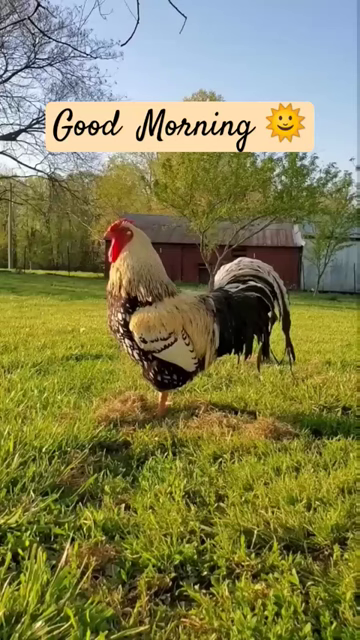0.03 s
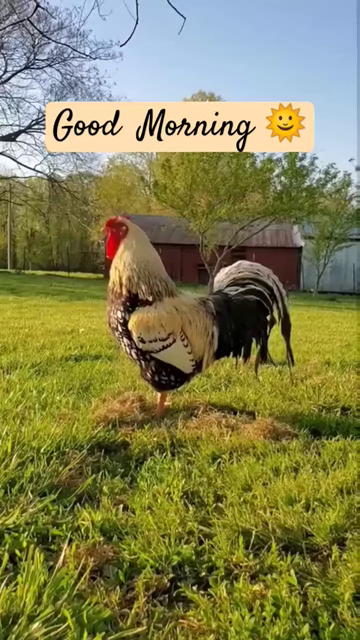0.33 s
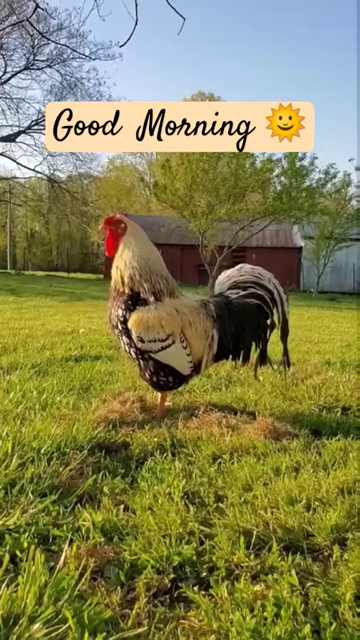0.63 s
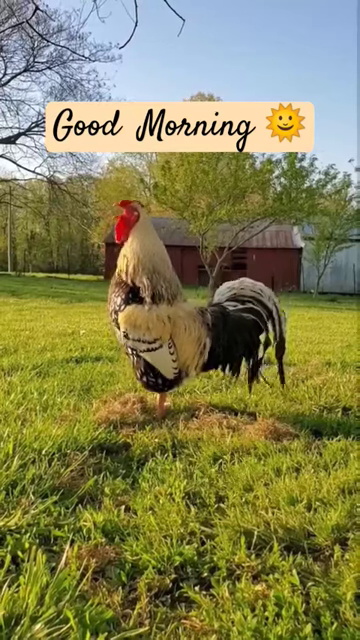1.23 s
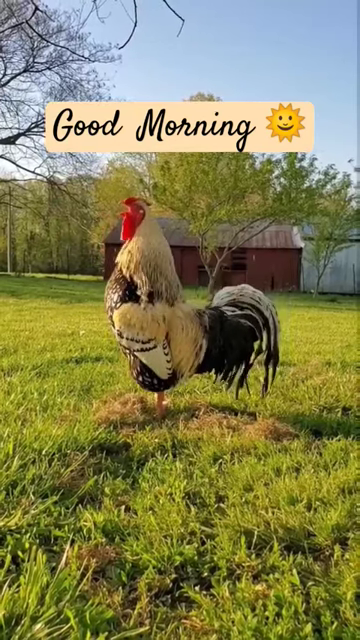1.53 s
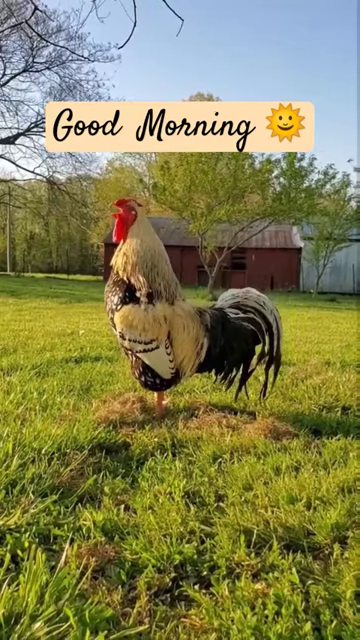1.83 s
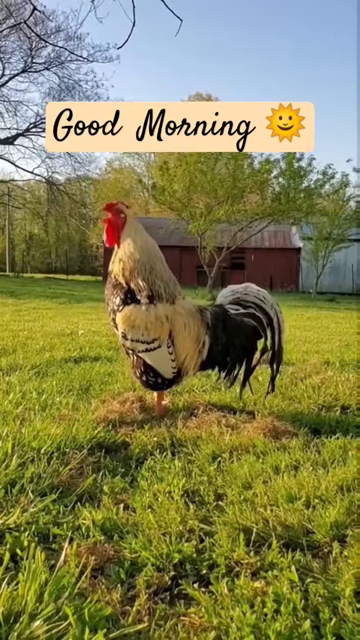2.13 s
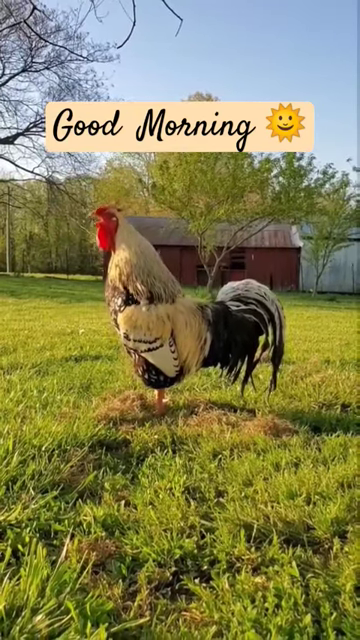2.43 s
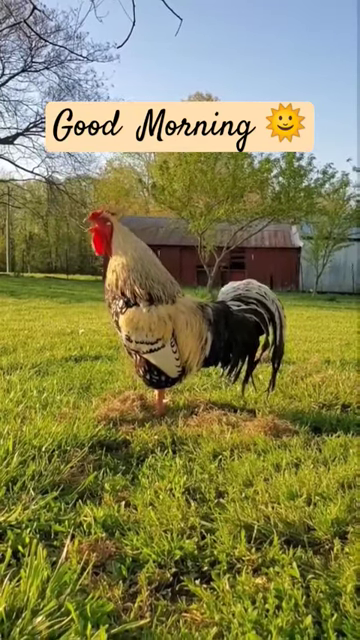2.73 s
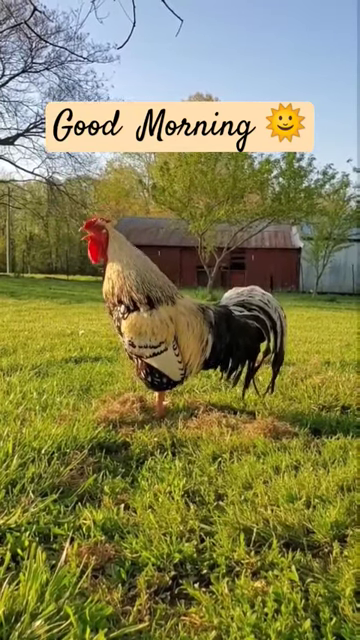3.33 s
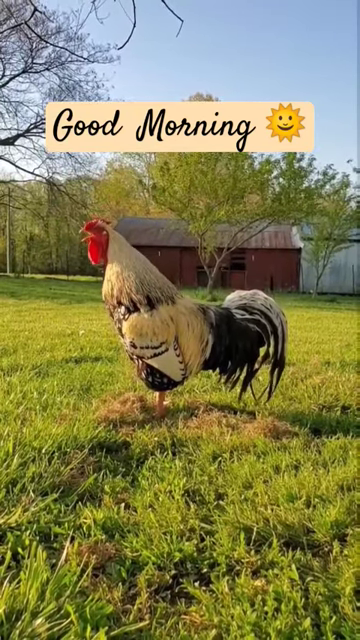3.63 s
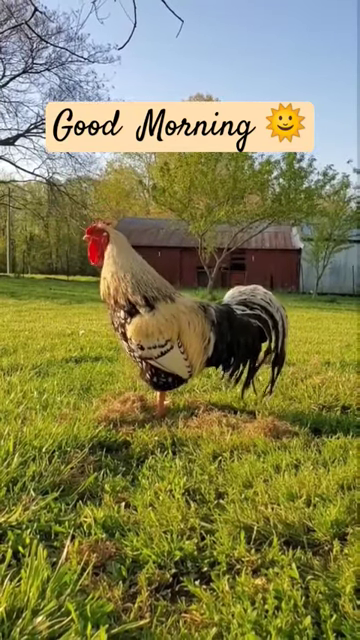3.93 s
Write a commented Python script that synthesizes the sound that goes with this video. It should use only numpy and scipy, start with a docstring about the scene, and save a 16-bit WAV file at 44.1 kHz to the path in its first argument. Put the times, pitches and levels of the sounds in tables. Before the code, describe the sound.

One loud rooster crow, raspy between its held notes, rises over quiet outdoor air.

```python
"""An open lawn: first faint outdoor air and a low throb like a far idling engine, then a few distant birds.
At 1.5 s a rooster close by crows once, in four syllables, while the throb and the air sink lower.
Its voice box makes pulses, coloured by throat, beak and nearby reflections; breath rushes out too.
A rough yelp opens the crow. Two clean held notes follow, each ending in a crack of rasp and
half tones (extra tones between the overtones). In the last syllable the voice sags away."""
import sys
import numpy as np
from scipy import signal
from scipy.fft import rfft, irfft
from scipy.io import wavfile
from scipy.ndimage import uniform_filter1d

SR = 44100
rng = np.random.default_rng(int(sys.argv[2]) if len(sys.argv) > 2 else 0)


def transcribe(u):
    """Save the signal u as a 16-bit wav file named by the first command-line argument.

    u: samples, shape (n,) or (channels, n), limited to [-1, 1]; the rate is SR.
    q: integer samples, one column per channel.
    """
    v = np.clip(np.atleast_2d(u).T, -1, 1)
    q = np.round(v * 32767).astype(np.int16)
    wavfile.write(sys.argv[1], SR, q)


N = 176400
TIME, FREQS = np.arange(N) / SR, np.fft.rfftfreq(N, 1 / SR)
BACKGROUND_START_S, CROW_START_S, HIGHEST_HZ = 0.287, 1.498, 15600


def amp(db):
    """Turn decibels into a factor to multiply by."""
    return 10 ** (np.asarray(db) / 20)


def unit_level(x):
    """Scale a signal to an average power of 1."""
    return x / np.sqrt(np.mean(x ** 2) + 1e-20)


def over_frequency(table, hz=FREQS):
    """Join the rows of a frequency table into a curve, spacing octaves evenly."""
    f, value = np.transpose(table)
    return np.interp(np.log(hz + 1), np.log(f), value)


def over_time(table):
    """Join the rows of a time table into one curve for each column of values."""
    times, *columns = np.transpose(table)
    return [np.interp(TIME, times, column) for column in columns]


def phase(hz):
    """The running angle of a wave whose pitch changes."""
    return 2 * np.pi * np.cumsum(hz) / SR


def gate(start, end, fade_s):
    """1 between two times and 0 outside, with a fade at each end."""
    return np.clip(np.minimum(TIME - start, end - TIME) / fade_s, 0, 1)


def wobble(hz):
    """A smooth random wiggle, about 1 in size, at rates up to hz."""
    size = N // 20
    slow = irfft(rfft(rng.standard_normal(size)) / (1 + (FREQS[:size // 2 + 1] / hz) ** 4), size)
    return np.interp(np.arange(N), np.arange(size) * 20, unit_level(slow))


# The tones of the throb: multiple of the cycle rate, level/dB
ENGINE_TONES = [(5, -44.5), (8, -37), (9, -46), (10, -49.5), (11, -49.5)]
# How the background sinks during the crow: t/s, level change/dB
BACKGROUND_DIP = [(1.5, 0.5), (1.75, -4), (1.9, -13), (2.8, -18.5), (3.3, -10), (3.9, -17.5)]

def engine():
    """Low tones on one wandering cycle beat together into a throb; the lowest dips less than the rest."""
    cycle_hz = 11.87
    turn = phase(cycle_hz * (1 + 0.015 * wobble(5.2)))
    dip_db, out = over_time(BACKGROUND_DIP)[0], 0
    for k, (multiple, db) in enumerate(ENGINE_TONES):
        level = amp(db + dip_db * (1 if k else 0.63)) * (1 + 0.031 * wobble(33))
        out = out + np.sqrt(2) * level * np.sin(round(multiple) * turn + 2 * np.pi * rng.random())
    return out


# The tone colour of the air: f/Hz, relative level/dB
AIR_COLOUR = [(20, -49), (43, -20), (98, -15.5), (167, -23.5), (231, -20.5), (286, -32), (335, -25),
              (404, -40.5), (573, -40.5), (903, -33.5), (1500, -45), (1950, -57), (2560, -54), (5500, -67),
              (15000, -74)]
# How alike the air sounds in both ears: f/Hz, likeness (1 = the same)
AIR_LIKENESS = [(180, 0.98), (550, 0.93), (1650, 0.2), (4970, 0.37), (15000, 0.14)]

def air():
    """Soft outdoor noise that swells and fades in small drifting patches."""
    level_db, patch_db, dip_share = -56, 2.5, 0.45
    frames, hz = N // 256 + 5, np.fft.rfftfreq(1024, 1 / SR)
    a, b, c, d, patches = rng.standard_normal((frames, len(hz), 5)).T
    patches = uniform_filter1d(patches, size=10, axis=0)  # smooth across frequency
    patches = unit_level(uniform_filter1d(patches, size=16, axis=1))  # and across time
    likeness = over_frequency(AIR_LIKENESS, hz)[:, None]
    left = a + 1j * b
    right = likeness * left + np.sqrt(1 - likeness ** 2) * (c + 1j * d)
    ears = np.array([left, right]) * amp(patch_db * patches)
    noise = signal.istft(ears, nperseg=1024, noverlap=768)[1][:, :N]
    spectrum = rfft(noise) * amp(over_frequency(AIR_COLOUR))
    midrange = irfft(spectrum * ((FREQS > 300) & (FREQS < 2000)), N).std()
    return irfft(spectrum, N) / midrange * amp(level_db + dip_share * over_time(BACKGROUND_DIP)[0])


# One bird note a row: start t/s, length/s, pitch f/Hz, blur/Hz, level/dB
BIRD_NOTES = [(0.428, 0.04, 2990, 500, -72), (0.56, 0.08, 3470, 300, -75), (0.89, 0.037, 3370, 350, -68),
              (0.937, 0.21, 2580, 60, -63.5), (1.16, 0.11, 3450, 298, -71), (0.61, 0.11, 7250, 900, -76)]

def birds():
    """Short notes and chips, blurred by distance."""
    out = np.zeros((2, N))
    for start, length, hz, blur_hz, db in BIRD_NOTES:
        progress = np.clip((TIME - start) / length, 0, 1)
        note = amp(db) * np.sqrt(8 * progress * (1 - progress)) * np.sin(2 * np.pi * hz * TIME)
        out += note * np.array([wobble(blur_hz), wobble(blur_hz)])
    return out


# Overtones that swell or fade alone in the second held note: multiple of the pitch
SWELLING_OVERTONES = (6, 8, 10, 7, 9)
# The swell of each, in the same order: t/s, level change/dB
OVERTONE_SWELLS = [(2.49, -7.5), (2.54, 9), (2.649, 16), (2.75, -21.5), (3.05, 11.5)]

def pulses(hz, offset=0, flicker_db=None):
    """A buzz of equal overtones. flicker_db adds flicker and swells; offset 0.5 gives the half tones."""
    swells, swell_s = dict(zip(SWELLING_OVERTONES, OVERTONE_SWELLS)), 0.082
    turn, out = phase(hz), 0
    for k in range(1, 28):
        db = 0
        if flicker_db is not None:
            db = flicker_db * min(k / 4, 1) ** 3 * wobble(86)  # the lowest three are steadier
            if k in swells:
                when, swell_db = swells[k]
                db = db + swell_db * np.exp(-((TIME - when) / swell_s) ** 2)
        out = out + amp(db) * np.cos((k - offset) * turn) * (k * hz < HIGHEST_HZ + 1000)
    return out


# The tune of the crow (yelp, two held notes, falling end): t/s, f/Hz
CROW_PITCH = [(1.497, 653.5), (1.505, 621.4), (1.52, 621.6), (1.528, 732), (1.56, 738.3), (1.567, 544.7),
              (1.605, 528), (1.645, 446.4), (1.685, 439), (1.704, 544), (1.712, 662), (1.722, 800),
              (1.73, 852), (1.745, 878), (1.765, 883), (1.825, 866), (1.85, 886), (1.872, 859.6),
              (1.93, 910.6), (2.04, 931.6), (2.2, 909.6), (2.245, 862.6), (2.278, 726.6), (2.3, 691),
              (2.312, 634), (2.324, 633), (2.335, 713), (2.352, 761), (2.372, 880), (2.392, 905.3),
              (2.42, 901), (2.48, 874.7), (2.55, 885), (2.7, 889.5), (2.8, 897.3), (3.04, 887.1),
              (3.125, 875.6), (3.17, 851.7), (3.2, 788), (3.213, 726.5), (3.3, 723.6), (3.318, 802.4),
              (3.355, 837), (3.42, 788.7), (3.53, 755), (3.62, 742.8), (3.73, 700.6), (3.82, 655.2),
              (3.878, 616), (3.886, 543), (4.0, 485.7)]
# Roughness next to the clean voice: t/s, rasp level/dB, half-tone level/dB
HOARSENESS = [(1.5, -13.5, -29), (1.555, -14, -24), (1.575, -4, -14.5), (1.715, -6, -37), (1.745, -35, -40),
              (2.04, -43, -56), (2.235, -35, -48), (2.272, -12, -6.5), (2.31, -10.5, -31), (2.353, -4, 2.5),
              (2.385, -29, -40), (2.45, -50.5, -56.5), (3.13, -42.5, -56.5), (3.19, -20, -32),
              (3.218, 1, 6.5), (3.25, -21.5, -13), (3.28, -7.5, 0.5), (3.325, -12.5, -1.5),
              (3.39, -33.5, -46.5), (3.58, -34, -44.5), (3.66, -29, -21), (3.87, -19, -11),
              (3.885, -5, -29), (3.91, -20.5, -35.5)]
# The tone colour of the hiss in the cracks: f/Hz, relative level/dB
HISS_COLOUR = [(1000, 3), (4500, 13), (9000, 27)]

def voice_box():
    """Where the voice cracks, its pulses shake, mix with hiss and repeat in pairs, making half tones."""
    (hz,), (rasp_db, half_db) = over_time(CROW_PITCH), over_time(HOARSENESS)
    rasp, effort = amp(rasp_db), strain()
    jitter = 0.061 * rasp * wobble(250)
    waver = 0.00094 * wobble(46)
    tremble = 0.0047 * effort * np.sin(phase(90 * (1 + 0.3 * wobble(60))))
    hz = hz * (1 + jitter + waver + tremble)
    buzz = pulses(hz, flicker_db=1.16 + 1.5 * effort)
    half_tones = amp(half_db) * pulses(hz, offset=0.5)
    flutter = 1 + 0.37 * rasp * wobble(360)
    voice = (buzz + half_tones) * flutter + second_voice()
    hiss = irfft(rfft(rng.standard_normal(N)) * amp(over_frequency(HISS_COLOUR)), N)
    return voice + rasp * hiss


def ringing(db):
    """Turn a tone colour into a filter that rings after each pulse, as a hollow space does."""
    cepstrum = irfft(np.log(amp(db)), N)
    forward_only = np.r_[1, np.full(N // 2 - 1, 2), 1, np.zeros(N // 2 - 1)]  # no sound before the pulse
    return np.exp(rfft(cepstrum * forward_only))


# The crow's tone colour in each part: throat and beak resonances, with notches from nearby
# reflections: f/Hz, relative level/dB
YELP_COLOUR = [(300, -41.5), (450, -16), (620, -7.5), (730, -17), (900, -9.5), (1060, 0.5), (1250, -6.5),
               (1460, -0.5), (1750, -27), (2100, -7), (2400, -37.5), (2900, -17.5), (3500, -24.5),
               (4300, -23), (4900, -12.5), (5900, -26.5), (6700, -49), (8000, -37), (11000, -46)]
FIRST_NOTE_COLOUR = [(300, -49.5), (650, -17), (900, -20), (1400, -14), (1760, -15), (1870, -17),
                     (2350, -48), (2620, -33), (2780, -21), (3100, -50.5), (3500, -13), (3720, -26),
                     (4020, -41.5), (4400, -19.5), (4700, -27.5), (5600, -24.5), (6150, -49), (6550, -72.5),
                     (7050, -59.5), (7400, -55.5), (9100, -56.5), (10000, -69.5)]
SECOND_NOTE_COLOUR = [(300, -49.5), (680, -17), (880, -31.5), (1100, -19), (1400, -11), (1780, -20),
                      (2350, -45.5), (2670, -40.5), (3100, -42), (3530, -24.5), (4000, -68.5), (4430, -34),
                      (5350, -28), (6250, -52.5), (7100, -53), (8000, -55), (8900, -53), (9700, -62.5),
                      (10800, -69.5), (11600, -49), (12500, -60)]
CRACK_COLOUR = [(380, -37.5), (730, -36.5), (1100, -26), (1460, -13), (2150, -29), (2400, -50), (3400, -44),
                (4050, -40.5), (4450, -68), (4850, -33), (5250, -51), (6600, -48.5), (7400, -68)]
FALL_COLOUR = [(350, -34), (510, -16.5), (650, -14.5), (715, -44), (760, -27), (820, -29), (920, -28),
               (1020, -31.5), (1300, -15), (1480, -15), (1620, -24.5), (1800, -29), (2140, -29.5),
               (2420, -73.5), (2620, -56.5), (2850, -30.5), (3150, -43), (3450, -49.5), (3800, -42),
               (4250, -55.5), (4480, -73.5), (4900, -45), (5200, -68.5), (5600, -50.5), (6400, -56.5),
               (7400, -80), (8300, -71), (10000, -88)]

def tone_colour(buzz):
    """Five colours in turn: throat and beak resonances, with notches from nearby reflections."""
    colours = [YELP_COLOUR, FIRST_NOTE_COLOUR, SECOND_NOTE_COLOUR, CRACK_COLOUR, FALL_COLOUR]
    changes_s, glide_s = [1.719, 2.332, 3.203, 3.335], 0.057
    reached = [1] + [np.clip((TIME - s) / glide_s + 0.5, 0, 1) for s in changes_s] + [0]
    spectrum, voice = rfft(buzz), 0
    for k, colour in enumerate(colours):
        coloured = irfft(spectrum * unit_level(ringing(over_frequency(colour))), N)
        voice = voice + (reached[k] - reached[k + 1]) * coloured
    return voice


# Loudness of the crow in three bands: t/s, body level/dB, treble level/dB, top level/dB
CROW_LEVELS = [(1.495, -21, -56, -87), (1.503, -12.5, -37.5, -53), (1.512, -10, -32.5, -59),
               (1.523, -17.5, -35, -51), (1.535, -14.5, -33.5, -52), (1.562, -13, -41, -52.5),
               (1.574, -18, -30, -51.5), (1.6, -17, -40, -55), (1.632, -41, -63, -72),
               (1.685, -42.5, -65.5, -92), (1.712, -17, -33.5, -52), (1.76, -13.5, -17, -45),
               (1.825, -15, -19, -46), (1.872, -21, -29.5, -51), (1.915, -16.5, -21.5, -39.5),
               (2.04, -14, -27.5, -42), (2.21, -19.5, -25, -44), (2.262, -27, -37, -54),
               (2.29, -21, -48.5, -65), (2.308, -34, -41.5, -65), (2.34, -22, -43, -64),
               (2.37, -21, -29, -47.5), (2.42, -18, -22, -43.5), (2.85, -21.5, -24.5, -46.5),
               (3.1, -22, -34.5, -41), (3.208, -29, -45.5, -56.5), (3.216, -22, -41, -51),
               (3.3, -20.5, -44.5, -52), (3.325, -24, -39, -50), (3.38, -20.5, -33, -41.5),
               (3.45, -20.5, -33.5, -57), (3.54, -16.5, -39.5, -62.5), (3.63, -15.5, -50, -54),
               (3.725, -15.5, -38.5, -49.5), (3.81, -21, -50, -59.5), (3.89, -20, -55, -65.5),
               (3.98, -23, -59, -74)]

def rooster():
    """The body, treble and top of the voice swell and fade with the bird's effort."""
    spectrum, out = rfft(tone_colour(voice_box())), 0
    band_starts = [(300, 8), (3050, 60), (6400, 60)]  # f/Hz, steepness
    above = [1 / (1 + (edge / (FREQS + 1)) ** steepness) for edge, steepness in band_starts] + [0]
    for k, db in enumerate(over_time(CROW_LEVELS)):
        band = irfft(spectrum * (above[k] - above[k + 1]), N)
        power = uniform_filter1d(uniform_filter1d(band ** 2, size=500), size=400)
        steady = band / np.sqrt(abs(power) + 1e-12)
        shimmer_db = 0.96 * strain() * wobble(43.5)
        out = out + steady * amp(db + shimmer_db)
    return out * np.clip((TIME - CROW_START_S) / 0.0021, 0, 1)


# The tone colour of the breath: f/Hz, relative level/dB
BREATH_COLOUR = [(700, -16.5), (1700, -3), (2400, -21.5), (3000, -8.5), (4000, -7.5), (4450, -21),
                 (4900, 4.5), (5900, 0.5), (7200, -16.5), (8500, -11.5), (13000, -3)]
# Its loudness: t/s, level/dB
BREATH_LEVEL = [(1.68, -71), (1.73, -54.5), (2.2, -53), (2.3, -59), (3.12, -68), (3.4, -53), (3.72, -58.5),
                (3.95, -67.5)]

def breath():
    """Air rushes through the open beak in puffs, at the pitch of the voice."""
    puffs = 1 + np.cos(phase(over_time(CROW_PITCH)[0]))
    rush = irfft(rfft(puffs * rng.standard_normal(N)) * amp(over_frequency(BREATH_COLOUR)), N)
    return unit_level(rush) * amp(over_time(BREATH_LEVEL)[0]) * (TIME > CROW_START_S)


# Which ear hears the crow louder: f/Hz, left minus right level/dB
EAR_BALANCE = [(400, 2), (640, -22), (740, 10), (830, 6.5), (910, 17), (1080, 8), (1480, 6), (1620, -0.5),
               (1770, -10.5), (2050, -10.5), (2450, 0), (2850, -6), (3120, -13), (3520, 7.5), (3800, -2.5),
               (4400, 2.5), (5000, -0.5), (7000, 4.5), (8500, 9)]
# Which ear hears it first: f/Hz, left lead/radians
EAR_LEAD = [(520, -5), (760, -0.5), (870, -3), (970, 4), (1060, 1), (2000, 0.5)]

def at_the_ears(crow):
    """Each frequency reaches the two ears with its own balance and timing."""
    ratio, lead = amp(over_frequency(EAR_BALANCE)), over_frequency(EAR_LEAD)
    ears = np.array([ratio, np.exp(-1j * lead)]) * np.sqrt(2 / (1 + ratio ** 2))
    return irfft(rfft(crow) * ears, N)


def yard_echo(crow, level_db=-24, fade_s=0.22, dull_hz=5000):
    """Trees and a barn scatter back a faint, dull echo."""
    t = TIME[:SR]
    tail = rng.standard_normal((2, SR)) * amp(-60 * t / fade_s) * (t > 0.008)
    tail = signal.lfilter(*signal.butter(1, dull_hz, fs=SR), tail)
    return amp(level_db) * signal.fftconvolve(crow[None], tail / np.linalg.norm(tail[0]), axes=1)[:, :N]


def second_voice(hz=780, level_db=1.3):
    """The other side of the voice box joins the yelp at a pitch of its own."""
    return amp(level_db) * gate(1.567, 1.69, fade_s=0.0055) * pulses(hz * (1 + 0.012 * wobble(100)))


# When the rooster forces its voice: start t/s, end t/s
STRAINED_TIMES = [(1.961, 2.29), (3.3, 3.42)]

def strain():
    """How hard the voice is forced, from 0 to 1; forcing makes its pitch and level shake."""
    return sum(gate(start, end, fade_s=0.03) for start, end in STRAINED_TIMES)


def scene():
    """The crow and its echo over engine, air and birds, all after a moment of silence."""
    crow = rooster() + breath()
    mix = at_the_ears(crow) + yard_echo(crow) + engine() + air() + birds()
    return mix * np.clip((TIME - BACKGROUND_START_S) / 0.0005, 0, 1)


def record(dry):
    """Cut away the very highest treble."""
    low_pass = signal.firwin(511, HIGHEST_HZ, window=("kaiser", 9), fs=SR)
    return signal.oaconvolve(dry, low_pass[None], "same")


dry = scene()
out = record(dry)
transcribe(out)
```